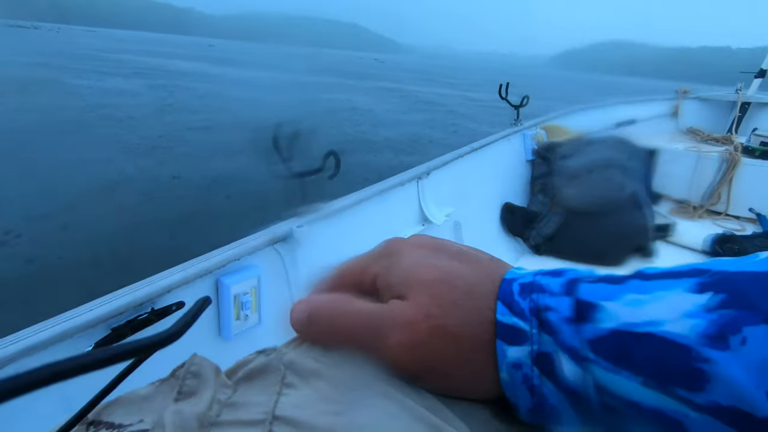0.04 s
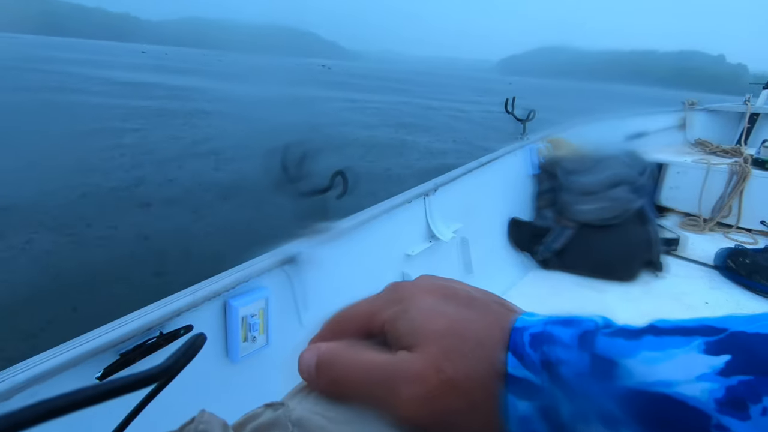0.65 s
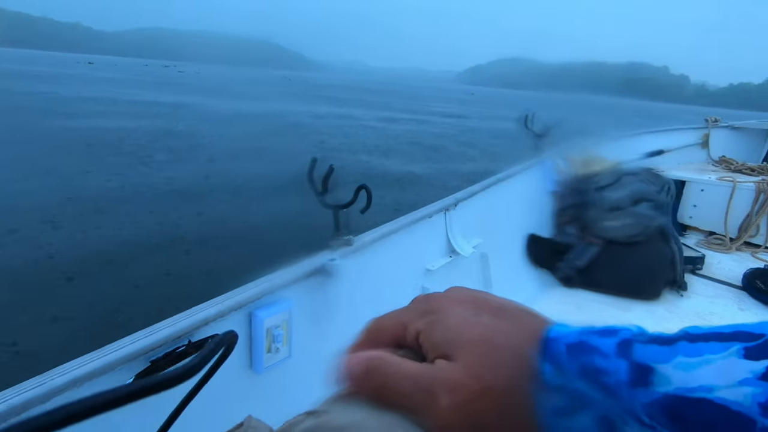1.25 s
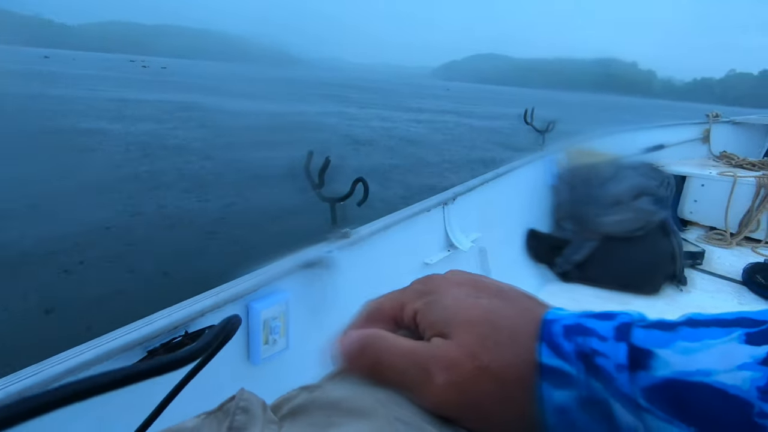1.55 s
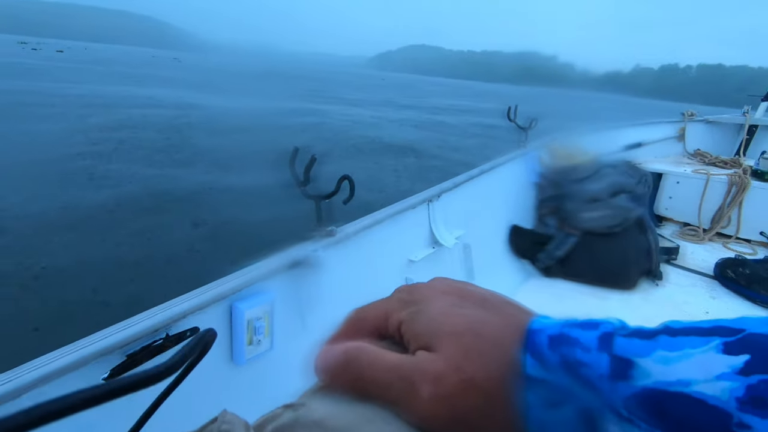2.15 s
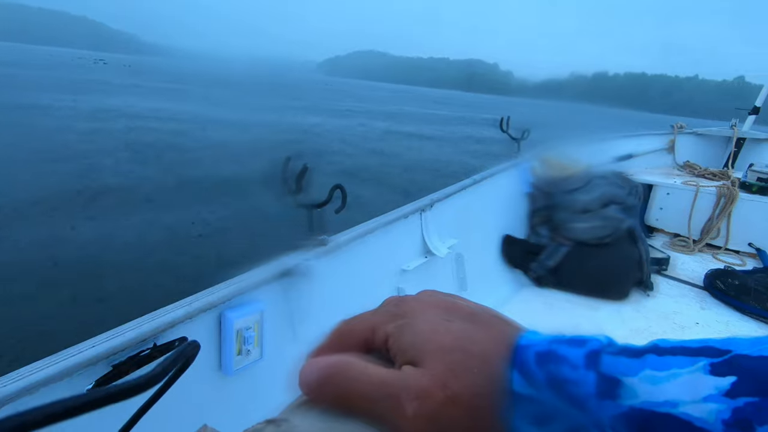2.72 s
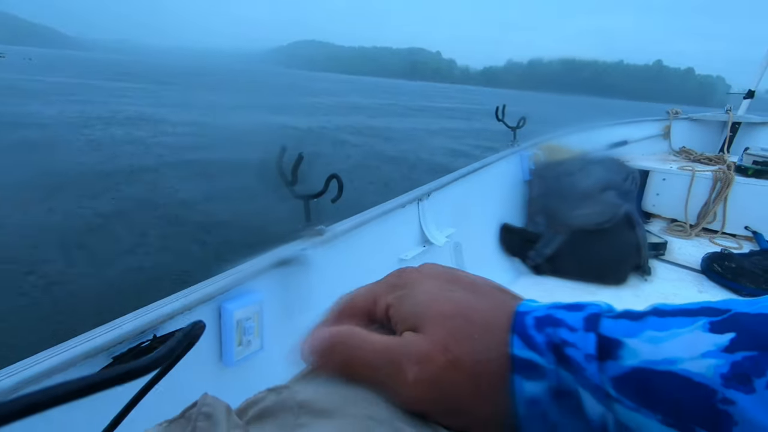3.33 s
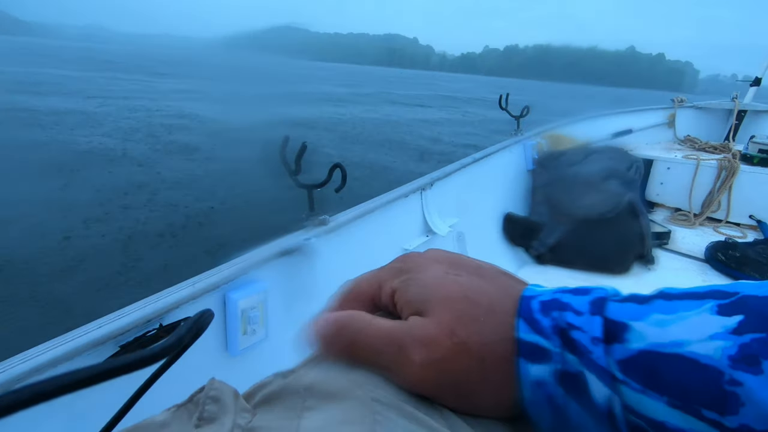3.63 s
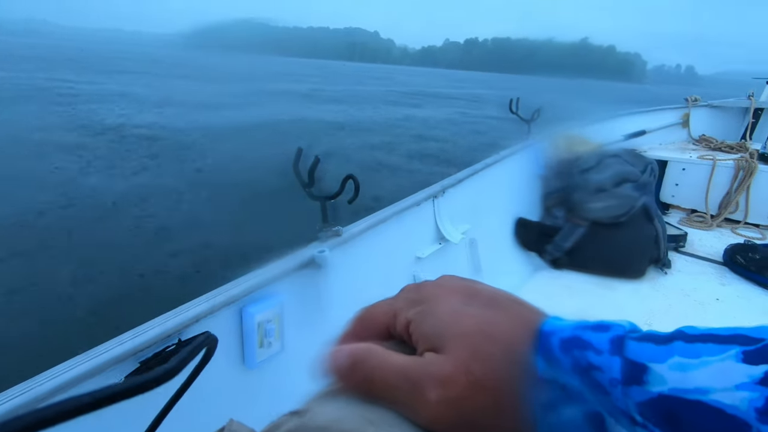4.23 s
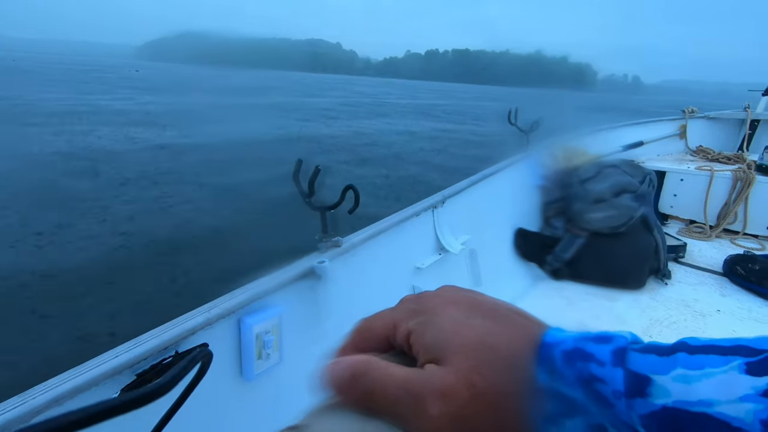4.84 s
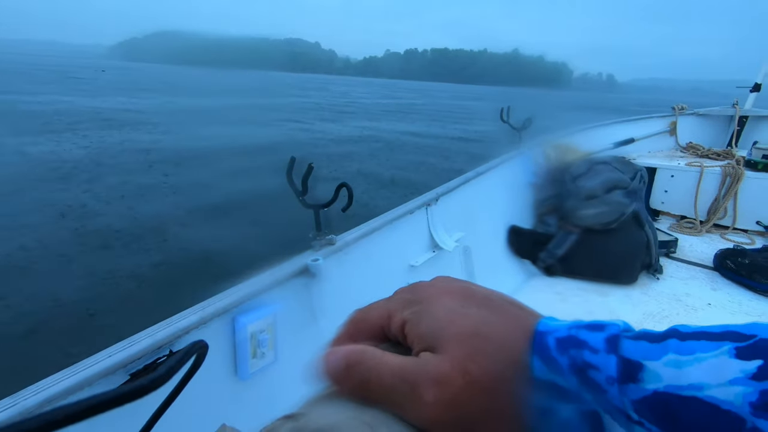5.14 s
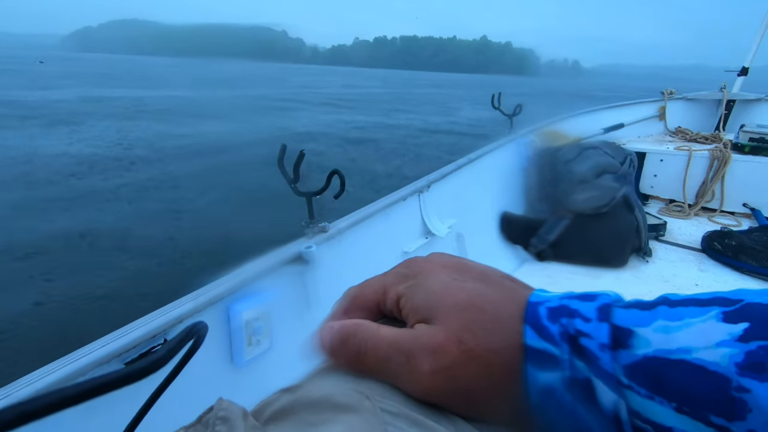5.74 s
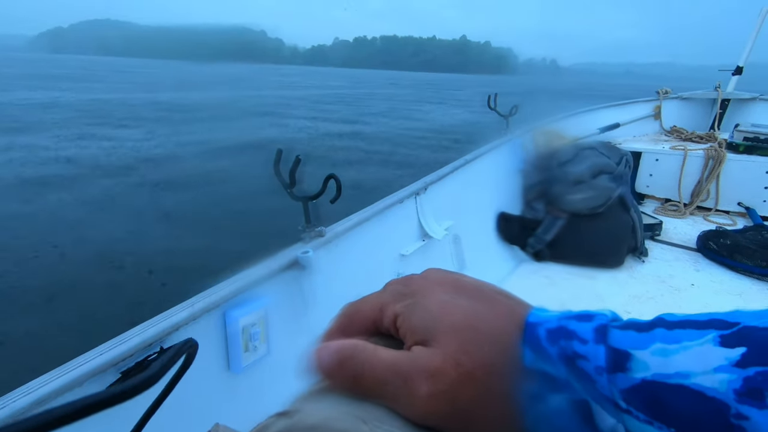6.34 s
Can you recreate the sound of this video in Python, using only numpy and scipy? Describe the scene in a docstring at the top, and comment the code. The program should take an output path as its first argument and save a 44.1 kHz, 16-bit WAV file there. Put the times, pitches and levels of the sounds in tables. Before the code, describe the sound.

A small outboard motor runs throughout, heard from aboard an open boat on a lake. Its low, throbbing drone booms through the hull, with a wavering gear whine and a soft, pulsing hiss on top. Water washes unevenly along the side, with slightly harder slaps around 1.2 and 2.4 seconds. Light rain patters, and single drops tick sharply close to the microphone, mostly before 4.5 seconds.

The motor's pitch sags slightly until about 2 seconds, then rises to a peak near 3 seconds as a loose fitting rattles rapidly. It eases back by 3.5 seconds and the rattle weakens. From about 5 seconds the motor climbs again, higher than before, and the rattle returns strongly, with a faint ring from the motor's metal cover. The sound, centred until then, spreads wider in the last second, with the motor at its fastest around 6.5 seconds.

```python
"""A two-cylinder outboard drones over washing water, heard from aboard an open boat on a lake in light rain.
Each firing thumps the hull, the gears whine, air and valves hiss under the cowl, and a loose fitting
rattles once a cycle when the shaking is strong. Drops tick close to the microphone.
The throttle opens briefly, eases, then opens further; late on, the cowl's sheet metal rings.
The sound is mono until it spreads in the last second."""
import sys
import numpy as np
from scipy import signal
from scipy.fft import rfft, irfft
from scipy.io import wavfile
from scipy.ndimage import uniform_filter1d

SR = 44100
rng = np.random.default_rng(int(sys.argv[2]) if len(sys.argv) > 2 else 0)


def transcribe(u):
    """Save the signal u as a 16-bit wav file named by the first command-line argument.

    u: samples, shape (n,) or (channels, n), limited to [-1, 1]; the rate is SR.
    q: integer samples, one column per channel.
    """
    v = np.clip(np.atleast_2d(u).T, -1, 1)
    q = np.round(v * 32767).astype(np.int16)
    wavfile.write(sys.argv[1], SR, q)


N = 290077
TIME = np.arange(N) / SR


def gain_of(db):
    """Decibels to amplitude."""
    return 10 ** (np.asarray(db) / 20)


def unit_rms(x):
    """Scales to rms 1."""
    return x / np.sqrt(np.mean(x ** 2) + 1e-20)


def curves(rows, along=TIME):
    """A table's later columns, joined by straight lines over its first (time by default)."""
    knots, *columns = np.transpose(rows)
    return [np.interp(along, knots, column) for column in columns]


def swells_db(rows):
    """Brief bell-shaped rises and dips in level."""
    return sum(db * np.exp(-((TIME - centre) / half_width) ** 2) for centre, db, half_width in rows)


def colour(x, spectrum, size=8192):
    """Causal filter with the given spectrum: it rings after a blow, never before."""
    knots_hz, db = np.transpose(spectrum)
    hz = abs(np.fft.fftfreq(size, 1 / SR))
    log_gain = np.log(gain_of(np.interp(np.log(hz + 1), np.log(knots_hz + 1), db)))
    taps = np.fft.ifft(np.exp(np.conj(signal.hilbert(log_gain)))).real[:size // 2]
    return signal.oaconvolve(x, taps)[:len(x)]


def resonate(x, hz, *widths_hz):
    """Resonances of gain 1 at one pitch, in series, one for each width."""
    for width in widths_hz:
        pole = np.exp((2j * np.pi * hz - np.pi * width) / SR)
        x = 2 * signal.lfilter([1 - abs(pole)], [1, -pole], x + 1e-18).real
    return x


def drift(rate_hz):
    """Random wavering of rms 1, up to the given rate."""
    hz = np.fft.rfftfreq(N, 1 / SR)
    return unit_rms(irfft(rfft(rng.standard_normal(N)) / (1 + (hz / rate_hz) ** 4), N))


def blows(cycles, place, scatter_db, jitter_s):
    """One click per cycle at the given share of the cycle, uneven in strength and time."""
    at = np.flatnonzero(np.diff(np.floor(cycles - place)) > 0)
    strength, slip = rng.standard_normal((len(at), 2)).T
    at = np.clip(at + np.round(slip * jitter_s * SR).astype(int), 0, N - 1)
    return np.bincount(at, gain_of(scatter_db * strength), N)


def echoes(x, t60_s, count=400):
    """Dense dying reflections between the sides of the boat."""
    delay_s = rng.uniform(.002, .15, count)
    strength = rng.choice([-1, 1], count) * gain_of(-60 * delay_s / t60_s)
    taps = np.bincount((delay_s * SR).astype(int), strength)
    return signal.oaconvolve(x, taps / np.linalg.norm(taps))[:N]


# The outboard's pace: time_s, cycles_per_s
ENGINE_SPEED = [(0.0, 23.75), (0.17, 24.08), (0.49, 23.24), (0.65, 23.36), (0.98, 22.45), (1.59, 23.16),
                (1.9, 22.93), (2.1, 22.08), (2.78, 27.28), (3.13, 27.77), (3.43, 24.57), (3.61, 24.02),
                (3.9, 24.8), (4.47, 24.4), (4.73, 25.28), (5.07, 24.58), (6.0, 30.35), (6.3, 31.58),
                (6.58, 32.0)]
def crank():
    """Cycles run so far, and their rate; a cycle is two turns of the crank and holds two firings."""
    speed, = curves(ENGINE_SPEED)
    return np.cumsum(speed) / SR, speed


def throttle_of(speed, lead_s=.065):
    """The load on the motor, 0 to 1: the throttle opens just ahead of a gain in speed."""
    acceleration = np.maximum(np.gradient(speed) * SR, 0)
    heading_for = speed + uniform_filter1d(lead_s * acceleration, 6000)
    return np.clip((heading_for - 23.4) / 2.15, 0, 1)


# Modes of the hull around the microphone: pitch_hz, width_hz, easy_db, pushed_db
HULL_MODES = [(48.4, 4.4, -23, -22.5), (54.2, 7.7, -24.5, -20), (57.7, 11, -19.5, -27),
              (80.3, 13.6, -26.5, -24), (102.6, 16, -33.5, -21.5), (117.3, 26, -36, -38.5),
              (125.9, 12.6, -19.5, -21), (141.2, 14.8, -48.5, -16.5), (162.3, 13, -30.5, -34),
              (191.9, 21, -29, -33), (222.1, 12, -32.5, -26.5), (239.1, 12.2, -30, -23.5),
              (272.7, 51.7, -28, -31), (297.5, 23.4, -29, -43.5), (339.3, 35.4, -30, -35.5),
              (373, 19, -44, -37.5), (492, 97, -53, -52)]
def hull_response(hz, throttle, floor_db=-48, smear_s_per_hz=3e-5):
    """Gain and lag (radians) of a tone: each mode lifts and delays those near it, so the hull rings on."""
    power = gain_of(floor_db) ** 2
    lag = np.pi * smear_s_per_hz * np.maximum(hz - 120, 0) ** 2  # late highs blunt each firing
    for mode_hz, width_hz, easy_db, pushed_db in HULL_MODES:
        detune = 2 * (hz - mode_hz) / width_hz
        peak = gain_of(easy_db + (pushed_db - easy_db) * throttle)
        power += (peak / (1 + detune ** 2)) ** 2
        lag += .45 * np.arctan(detune) * np.exp(-(detune / 4) ** 2)
    return np.sqrt(power), lag


# One hull panel booms now and then: centre_s, lift_db, half_width_s
PANEL_BOOMS = [(1.63, 13, 0.054), (2.08, 12, 0.12), (2.947, 9.5, 0.11), (3.413, 7, 0.071), (3.7, 9, 0.3),
               (4.664, 8.5, 0.11), (5.627, 5.5, 0.076), (5.9, 4.5, 0.45), (6.214, 13.5, 0.12)]
# The lowest thump dies away when the motor labours: cycles_per_s, gain_db
LOWEST_THUMP = [(22.1, -15), (22.6, -11.5), (23.0, -3), (23.6, -2.5), (32, -2.5)]
def hull_drone(cycles, speed, panel_hz=227.6, panel_spread_hz=14, throb_db=-45):
    """Two unlike firings a cycle shake the hull; each engine order swells as it crosses a mode."""
    throttle = throttle_of(speed)
    unsteady = np.interp(speed, [27, 30], [1, .6])
    boom_db = swells_db(PANEL_BOOMS)
    thump_db, = curves(LOWEST_THUMP, speed)
    drone = gain_of(throb_db) * throttle * np.cos(2 * np.pi * cycles)
    for order in range(2, 23):
        odd, hz = order % 2, order * speed
        phase = 2 * np.pi * (order * (cycles - .02) - .09 * min(order, 4)) + odd * np.pi / 2
        wander = unsteady * min(.06 * order, .55) * drift(2.5)
        waver_db = unsteady * min(.6 * order, 2) * drift(5)
        order_db = odd * (-5 if order < 7 else -2) + thump_db * (order == 2)
        panel_db = boom_db * np.exp(-((hz - panel_hz) / panel_spread_hz) ** 2)
        gain, lag = hull_response(hz, throttle)
        drone += gain * gain_of(order_db + waver_db + panel_db) * np.cos(phase + wander - lag)
    return np.sqrt(2) * drone


# Water just outside the hull: frequency_hz, level_db
WASH_SPECTRUM = [(20, -23.5), (40, -14), (75, -7), (140, -4.5), (260, -6), (350, -13), (430, -17),
                 (600, -18.5), (760, -29.5), (1100, -23.5), (1450, -41), (3000, -42), (9000, -70.5)]
# Small waves slap the side: centre_s, lift_db, half_width_s
WAVE_SLAPS = [(0.8, -2, 0.0063), (1.204, 5.5, 0.05), (1.344, 3.5, 0.058), (2.402, 5.5, 0.15),
              (5.476, 3, 0.029)]
# The background rush of water and motor briefly dips or swells: centre_s, change_db, half_width_s
RUSH_CHANGES = [(0.66, 0, 0.17), (1.742, 1, 0.1), (2.851, -3.5, 0.14), (3.622, -4, 0.22), (4.896, 0, 0.22),
                (5.257, -1.5, 0.15), (6.453, 0.5, 0.17)]
def water_wash(level_db=-26.2, swell_db=1.1):
    """Water churns unevenly along the hull, with a few harder slaps; the rush briefly dips or swells."""
    change_db = swell_db * drift(6.9) + swells_db(WAVE_SLAPS + RUSH_CHANGES)
    churn = unit_rms(colour(rng.standard_normal(N), WASH_SPECTRUM))
    return gain_of(level_db + change_db) * churn


# The gears, quietest in the middle of the speed range: cycles_per_s, level_db
WHINE_LEVEL = [(22.3, -27), (22.8, -30), (23.3, -35), (23.9, -31), (24.8, -35), (26, -44.5), (27.6, -61.5),
               (28.5, -35), (30.5, -42), (32, -30.5)]
def gear_whine(cycles, speed, meshes_per_cycle=26, flutter_db=2.6, trim_db=-2):
    """Gear teeth mesh; the crank's uneven pull throws wavering sidebands, which fade at high speed."""
    level_db, = curves(WHINE_LEVEL, speed)
    uneven = np.interp(speed, [25, 29], [1, .25])
    wobble = .4 * drift(60) + .6 * drift(4)
    mesh = np.zeros(N)
    for sideband, db in enumerate([-6, -4, 2.5, -9.5, -26.5], -2):
        gain = gain_of(db + uneven * flutter_db * drift(7)) * (uneven if sideband else 1)
        phase = 2 * np.pi * (meshes_per_cycle + sideband) * (cycles - .6)
        mesh += gain * np.cos(phase + uneven * (wobble + 1.45 * drift(1.8)))
    return gain_of(level_db + trim_db) * unit_rms(mesh)


# Air and valve gear under the cowl: frequency_hz, level_db
HISS_SPECTRUM = [(760, 0), (1300, -5.5), (1420, -8), (1680, -9), (1850, -14), (2240, -12), (2530, -14),
                 (2840, -10), (3260, -19), (3470, -10.5), (4360, -19), (5330, -16.5), (5940, -21.5),
                 (9890, -24.5), (11400, -67), (14900, -104), (22000, -120)]
# The hiss as it reaches the microphone: time_s, level_db
HISS_LEVEL = [(0, -41), (1.7, -40), (3.1, -40.5), (3.55, -43), (4.4, -39.5), (5.3, -40.5), (5.75, -41.5),
              (6.58, -37)]
# The cowl's resonances, whose balance shifts midway: pitch_hz, width_hz, before_db, after_db
COWL_MODES = [(1069, 64, -6.5, -5.5), (2200, 110, -28, -13), (3026, 34, -32, -19),
              (3310, 140, -14.5, -20.5)]
def engine_hiss(cycles, speed, gulp_db=10.5, gulp_place=.34, split_hz=4300, trim_db=-.5):
    """Air rushes once a cycle and the valves tick, more strongly at speed; the cowl resonates."""
    level_db, = curves(HISS_LEVEL)
    from_gulp = (cycles - gulp_place + .5) % 1 - .5
    gulp = np.exp(-(from_gulp / .085) ** 2)
    air = unit_rms(rng.standard_normal(N) * gain_of(gulp_db * gulp + .28 * drift(60)))
    ticks = sum(blows(cycles, place, scatter_db=2.5, jitter_s=3e-5) for place in (.1, .36, .46, .68, .88))
    valves = unit_rms(echoes(ticks, t60_s=.044))
    valve_share = np.clip(.27 + .16 * (speed - 23), 0, .8)
    source = np.sqrt(1 - valve_share) * air + np.sqrt(valve_share) * valves
    shift = np.clip((TIME - 4) / .39, 0, 1)
    cowl = sum(gain_of(before + (after - before) * shift) * unit_rms(resonate(source, hz, width, width))
               for hz, width, before, after in COWL_MODES)
    # the mid treble pulses; above it the hiss is smooth
    pulsing = signal.lfilter(*signal.butter(3, split_hz, fs=SR), source)
    smooth = signal.lfilter(*signal.butter(3, split_hz, "high", fs=SR), rng.standard_normal(N))
    hiss = unit_rms(colour(pulsing + gain_of(-13) * smooth, HISS_SPECTRUM))
    return gain_of(level_db + trim_db) * (hiss + cowl)


# Modes of a loose fitting aboard: pitch_hz, width_hz, knock_db, rebound_db
FITTING_MODES = [(876, 46, -22.5, 0), (993, 62, -5.5, 4.5), (1039, 172, 1.5, 7.5), (1090, 73, -10.5, -12),
                 (1265, 33, -21, -18), (1670, 57, -30.5, -13.5)]
# The dry crack of its knock: frequency_hz, level_db
CRACK_SPECTRUM = [(500, -42), (720, -12), (840, 2), (980, 2), (1150, 1), (1340, -6), (1420, -20),
                  (1480, -18), (1560, -5), (1650, -3), (1760, -10), (2050, -32), (4000, -55)]
# How hard it shakes: time_s, level_db
RATTLE_LEVEL = [(0, -56), (0.45, -66), (0.65, -49), (1.05, -51), (1.3, -45.5), (1.85, -48.5), (2.03, -34),
                (2.24, -44.5), (2.42, -41.5), (2.6, -32.5), (3.08, -31), (3.2, -39), (3.38, -46),
                (3.7, -61), (3.96, -40.5), (4.3, -50), (4.5, -44.5), (4.72, -37), (5.08, -44), (5.32, -32),
                (6.2, -32), (6.58, -31.5)]
# How it sits: time_s, knock_place_cycles, bounce_s, crack_db
FITTING_SEAT = [(0, .355, .00476, 2), (2.15, .355, .00476, 0), (2.35, .335, .00286, 0),
                (2.8, .27, .00286, 0), (3.15, .265, .00286, 0), (3.4, .29, .00286, 0),
                (3.7, .335, .00476, 2), (5.2, .33, .00476, 3), (5.9, .277, .00476, 3),
                (6.58, .25, .00476, 5)]
def fitting_rattle(cycles, speed, settle_s=.0124, settle_db=-11, echo_db=-15):
    """A loose fitting knocks, rebounds and settles once a cycle."""
    level_db, = curves(RATTLE_LEVEL)
    place, bounce_s, crack_db = curves(FITTING_SEAT)
    knock = blows(cycles, place, scatter_db=.6, jitter_s=1e-5)
    rebound = blows(cycles, place + bounce_s * speed, scatter_db=.7, jitter_s=1.5e-5)
    settle = blows(cycles, place + settle_s * speed, scatter_db=2, jitter_s=4e-5)
    ring = sum(resonate(gain_of(knock_db) * knock + gain_of(rebound_db) * rebound, hz, width, width)
               for hz, width, knock_db, rebound_db in FITTING_MODES)
    crack = colour(gain_of(crack_db) * (knock + gain_of(settle_db) * settle), CRACK_SPECTRUM)
    return gain_of(level_db) * unit_rms(crack + ring + gain_of(echo_db) * echoes(ring, t60_s=.08))


# Raindrops close to the microphone, levels before colouring: start_s, tick_db, tap_db, pitch_hz
NEAR_DROPS = [(0.1422, -39, -37, 4330), (0.179, -34, -21, 4450), (0.201, -32.5, -37, 4660),
              (0.4713, -37, -40, 4770), (0.5427, -39, -21, 5200.0), (0.6725, -36, -19, 4300.0),
              (0.8027, -38, -42, 4600.0), (0.8873, -32.5, -17, 7450), (0.9088, -39.0, -33, 4900.0),
              (0.945, -37.5, -30, 5130), (1.436, -36, -18.5, 5200), (1.76, -43, -31, 4600.0),
              (1.919, -41, -34, 7550), (1.94, -41, -18, 4630), (2.089, -36, -29, 8000),
              (2.2736, -38.5, -19, 5000.0), (2.281, -42, -31, 4300.0), (2.2918, -32, -17, 8000.0),
              (2.326, -32, -43, 4500.0), (2.356, -37, -26, 4650), (2.39, -26.5, -16, 8040),
              (2.674, -50, -20, 4500.0), (2.919, -44, -42, 7640), (2.99, -41, -42, 7750),
              (3.1154, -34, -13, 4400), (3.4433, -44, -24, 4300.0), (3.481, -43, -18, 4570),
              (3.532, -41.5, -26, 5450), (4.185, -32.5, -23, 9500), (4.5306, -30.5, -22, 8240)]
# A drop's bright tick: frequency_hz, level_db
TICK_SPECTRUM = [(2500, -84), (4500, -2.5), (6000, -2), (7800, -2), (9000, -9), (11500, -3.5)]
# Its duller tap: frequency_hz, level_db
TAP_SPECTRUM = [(700, -29), (1400, -5), (2000, -11), (3300, -8), (4500, -12.5), (6500, -35.5)]
def rain(tick_s=.00081, tail_s=.014, tap_s=.0017, patter_per_s=30, size=1500):
    """Near drops give a bright tick and a duller tap; many smaller ones patter around them."""
    t = np.arange(size) / SR
    tick_decay = np.exp(-t / tick_s) + .049 * np.exp(-t / tail_s)
    bright, dull = np.zeros((2, N + size))
    for start_s, tick_db, tap_db, pitch_hz in NEAR_DROPS:
        at = round(start_s * SR)
        tick, tap = rng.standard_normal((2, size))
        tick = unit_rms(tick + gain_of(10.5) * resonate(tick, pitch_hz, 1300))
        bright[at:at + size] += gain_of(tick_db + 1.5) * tick * tick_decay
        dull[at:at + size] += gain_of(tap_db + 5.5) * tap * np.exp(-t / tap_s)
    landings = rng.random(N) < patter_per_s / SR
    patter = landings * gain_of(-40 + 3.1 * np.minimum(rng.exponential(1, N), 3.2))
    ticks = colour(bright[:N] + patter, TICK_SPECTRUM)
    taps = colour(dull[:N] + patter, TAP_SPECTRUM)
    return ticks + taps + gain_of(-9) * echoes(taps, t60_s=.056)


# Sheet metal of the cowl: pitch_hz, width_hz, level_db
SHEET_MODES = [(2270, 180, -7.5), (2783, 32, 8), (3660, 54, -1.5), (3770, 83, -9), (4650, 41, -23)]
# Its ring, very faint until past midway: time_s, level_db
TINKLE_LEVEL = [(0, -68), (3.7, -68), (4.5, -58), (5.0, -53.5), (5.35, -49.5), (5.7, -58), (6.1, -56),
                (6.58, -59)]
def cowl_tinkle(cycles):
    """One firing a cycle sets the cowl's sheet metal ringing."""
    level_db, = curves(TINKLE_LEVEL)
    hits = blows(cycles, .37, scatter_db=1.5, jitter_s=1e-4)
    ring = sum(gain_of(db) * unit_rms(resonate(hits, hz, 900, width)) for hz, width, db in SHEET_MODES)
    return gain_of(level_db) * unit_rms(ring)


# Wet fizz at two of the near drops: start_s, pitch_hz, width_hz, level_db, decay_s
DROP_FIZZES = [(4.2, 7200, 915, -69, 0.1), (4.502, 7800, 1500, -63.5, 0.17)]
def drop_fizz():
    """A thin sizzle that starts at once and dies away, close in time to a drop."""
    noise, fizz = rng.standard_normal(N), np.zeros(N)
    for start_s, hz, width, level_db, decay_s in DROP_FIZZES:
        envelope = (TIME > start_s) * np.exp(-abs(TIME - start_s) / decay_s)
        fizz += gain_of(level_db) * envelope * unit_rms(resonate(noise, hz, width, width))
    return fizz


# The stereo image spreads near the end: time_s, width_share
IMAGE_OPENING = [(0, 0), (5.45, 0), (5.8, .5), (6.2, 1), (6.58, 1)]
# Side against mid at full width: frequency_hz, side_db
SIDE_SPECTRUM = [(100, -43.5), (300, -53.5), (500, -5.5), (1000, -8.5), (2000, -7), (4000, -6), (9000, 3.5)]
def scene():
    """From aboard: the motor, timed by its crank, with water along the hull and rain close by."""
    cycles, speed = crank()
    motor = hull_drone(cycles, speed) + gear_whine(cycles, speed)
    motor += fitting_rattle(cycles, speed) + engine_hiss(cycles, speed)
    drops = rain()
    mid = motor + cowl_tinkle(cycles) + water_wash() + drops + drop_fizz()
    opening, = curves(IMAGE_OPENING)
    side = opening * colour(echoes(mid, t60_s=.019), SIDE_SPECTRUM)
    side += gain_of(-38.5) * echoes(drops, t60_s=.02)  # the rain has a trace of width throughout
    return np.array([mid + side, mid - side])


def record(dry, edge_hz=11000):
    """The top of the treble is cut off."""
    lowpass = signal.firwin(81, edge_hz, window=("kaiser", 8), fs=SR)
    return signal.oaconvolve(dry, lowpass[None], "same", axes=1)


dry = scene()
out = record(dry)
transcribe(out)
```